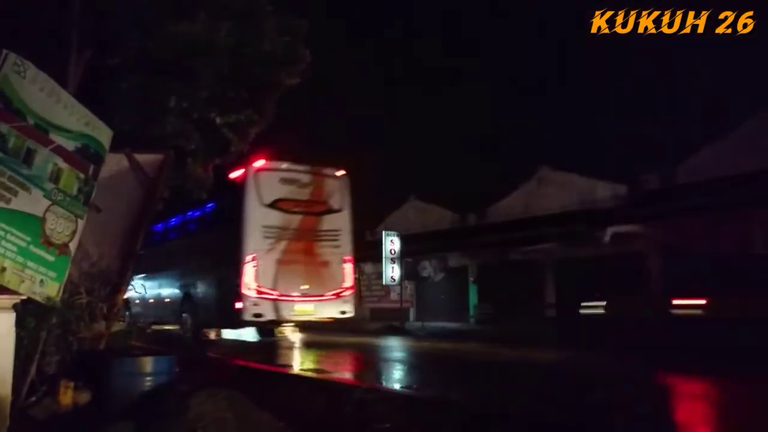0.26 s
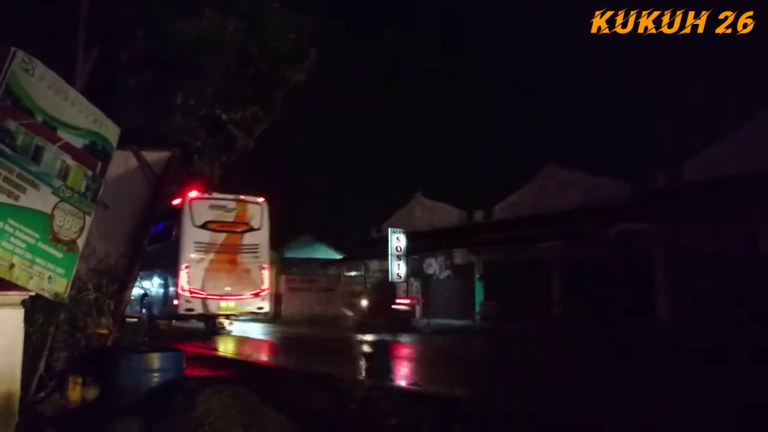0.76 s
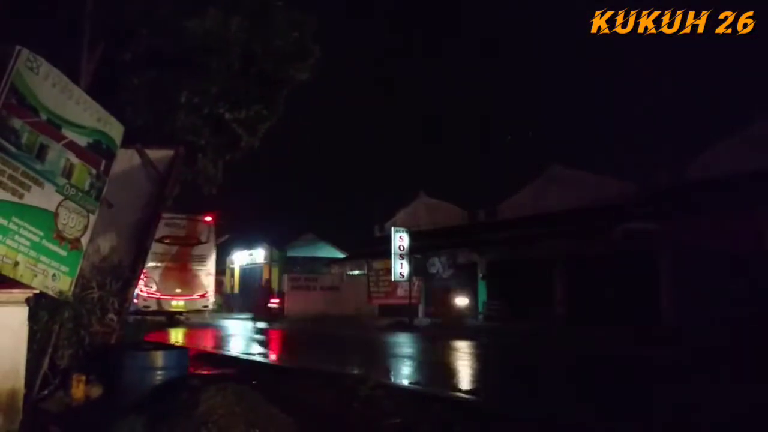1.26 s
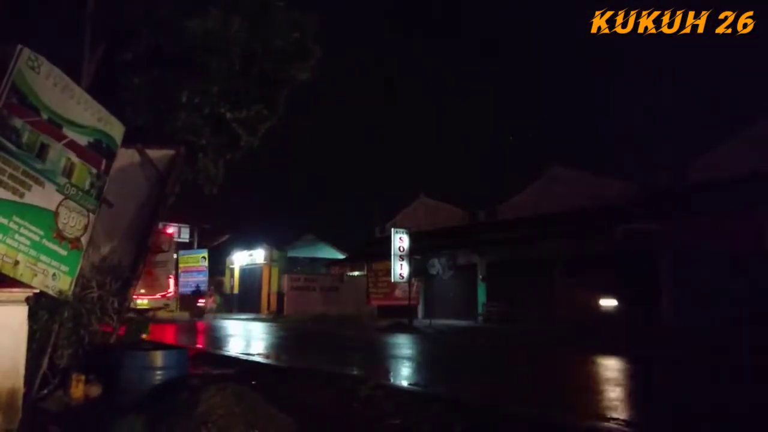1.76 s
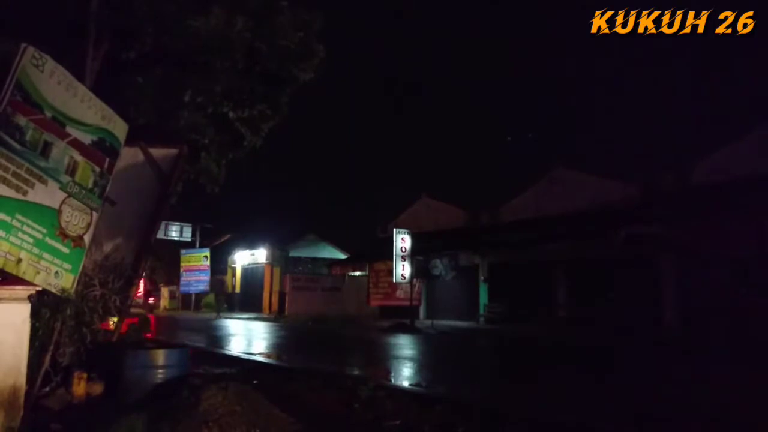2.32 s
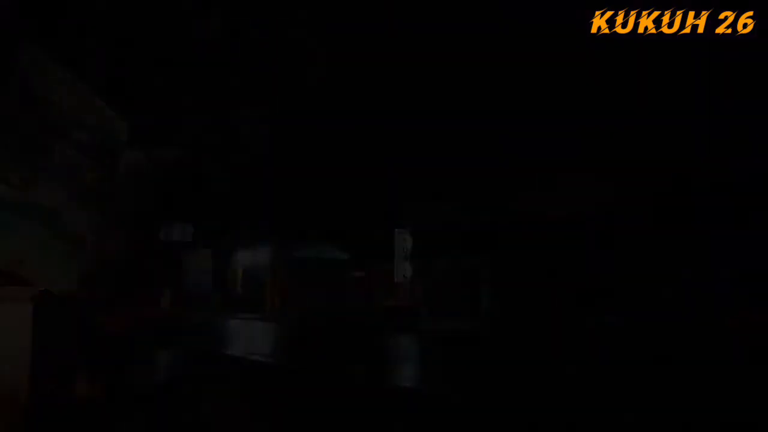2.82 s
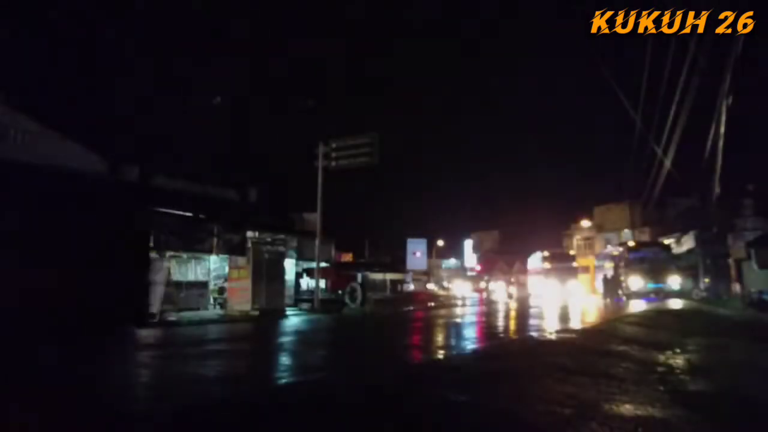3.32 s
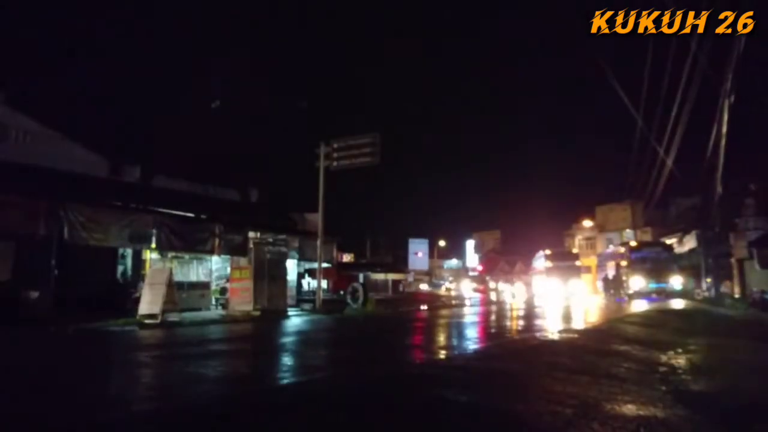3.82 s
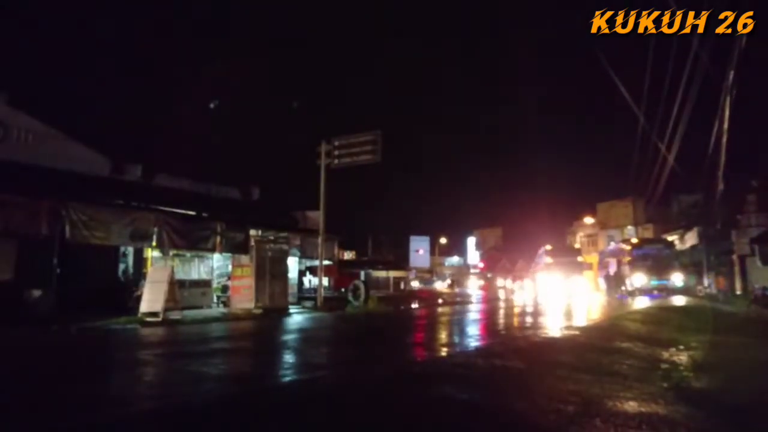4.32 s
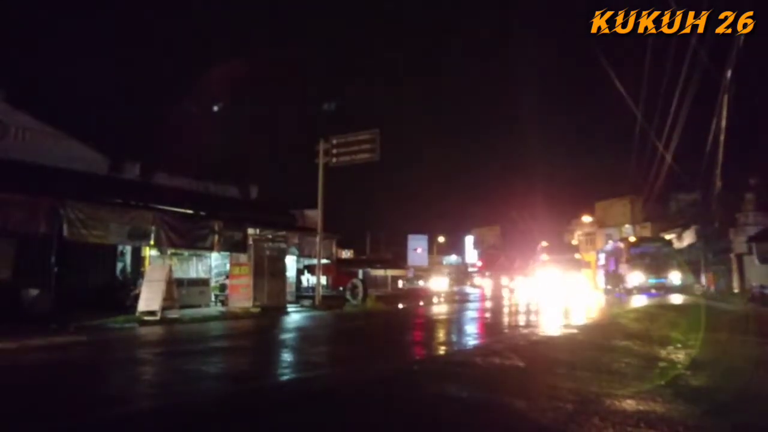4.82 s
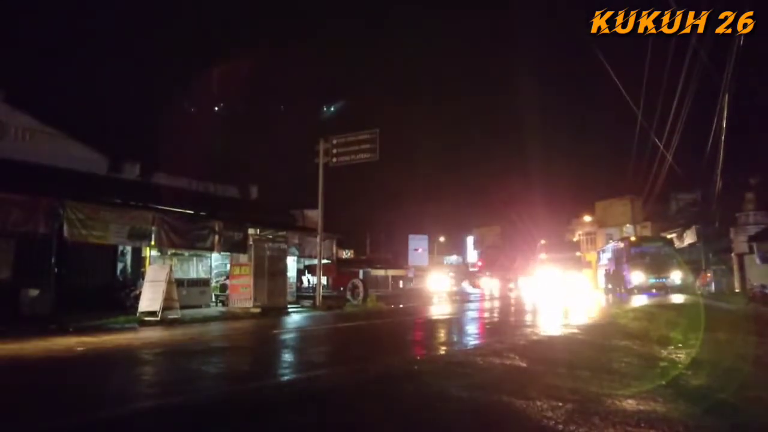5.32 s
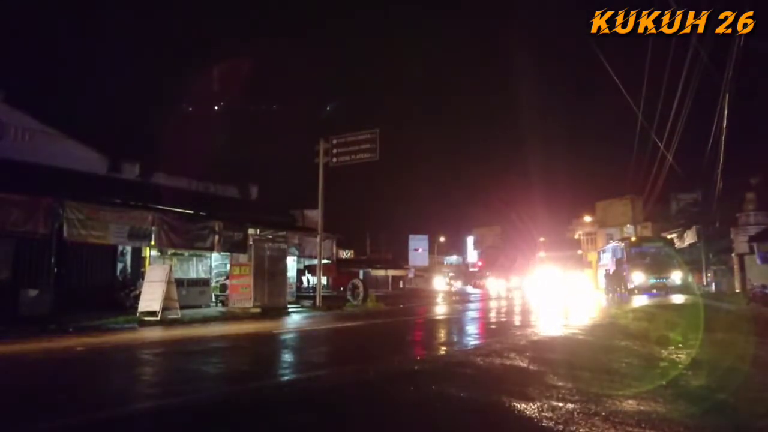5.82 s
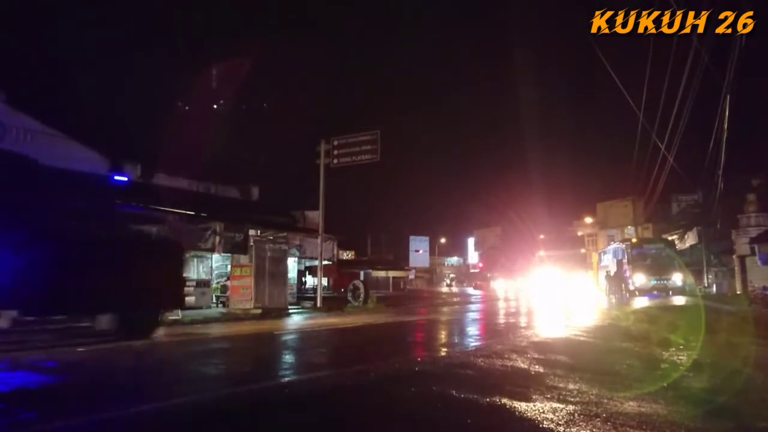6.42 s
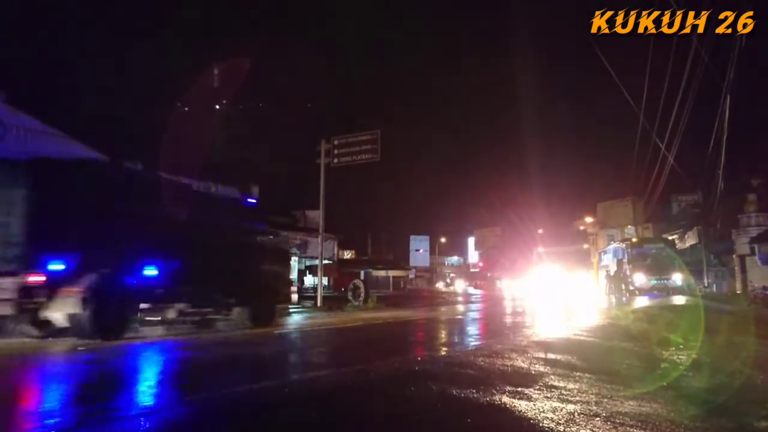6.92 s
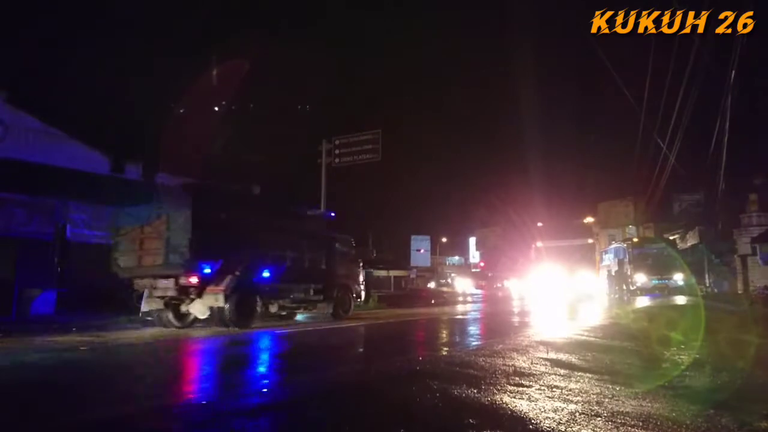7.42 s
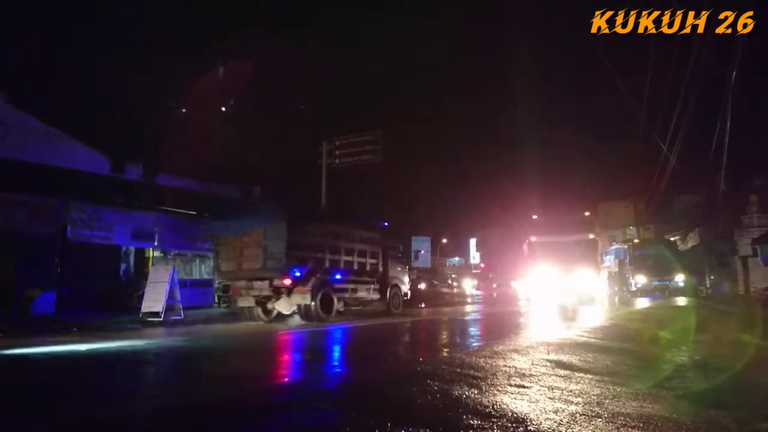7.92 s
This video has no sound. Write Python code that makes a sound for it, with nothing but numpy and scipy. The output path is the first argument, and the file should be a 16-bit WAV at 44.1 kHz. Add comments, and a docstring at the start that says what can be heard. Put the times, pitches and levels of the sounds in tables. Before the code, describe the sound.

A coach accelerates off as a motorbike revs past, fading to silence before a diesel lorry passes close, tyres rumbling and hissing through water.

```python
"""A diesel coach howls as it pulls away on a wet main road at night, while a motorbike revs up and passes.
Heard from the kerb, this fades to silence; then a diesel lorry cuts in, rolling close by as it slows.
Engines hum and knock with each firing of a cylinder; tyres rumble, drone and throw up hissing spray.
The left microphone port (its sound opening) is shaded at first and almost covered for the lorry."""
import sys
import numpy as np
from scipy import signal
from scipy.fft import rfft, irfft, next_fast_len
from scipy.io import wavfile

SR = 44100
rng = np.random.default_rng(int(sys.argv[2]) if len(sys.argv) > 2 else 0)


def bounce(signal):
    """Save signal as a 16-bit WAV file at the path given by the first command-line argument."""
    frames = np.transpose(np.atleast_2d(signal))
    limited = np.clip(frames, -1, 1)
    pcm = np.round(limited * 32767).astype(np.int16)
    wavfile.write(sys.argv[1], SR, pcm)


N = 360297
T = np.arange(N) / SR
SIZE = next_fast_len(N, real=True)
FREQ = np.arange(SIZE // 2 + 1) * SR / SIZE
HIDING_S, HIDDEN_S = 1.16, 1.55  # the coach goes out of sight and its howl, knock and hiss drop away
CUT_IN_S = 3.894  # the silence ends


def coach_firing():
    """How many times a second the coach's engine fires: faster and faster until the gear change."""
    start_hz, climb_hz_per_s, gear_change_s = 101.75, 14.3, 1.27
    return start_hz + climb_hz_per_s * np.minimum(T, gear_change_s)


def coach_exhaust():
    """Exhaust puffs merge into a rising hum; in the next gear the coach drones on in the distance."""
    db = -24.5 - 62 * since(HIDING_S - .08)
    near = exhaust(coach_firing(), [db - 1.5, db - 11, db - 21, db - 11.5], rough=.3)
    far_firing_hz = 103  # from afar only its even harmonics are heard
    far = exhaust(np.full(N, 2 * far_firing_hz), [-41.5, -39.5], rough=.7)
    return near + far * ramp(HIDDEN_S, 1.82) * undb(-12 * since(2.57))


# The note of the howl from the coach's engine bay: (time [s], pitch [Hz])
HOWL_PITCH = [(0, 902), (.27, 930), (.39, 907), (.49, 942), (.6, 908), (.85, 946), (1.26, 921), (1.38, 864),
              (1.7, 845)]
# Its whistle swells and dips: (time [s], half length [s], level change [dB])
WHISTLE_SWELLS = [(.11, 0.027, 8), (.28, .05, -4), (.46, 0.11, 7), (.65, 0.048, 5), (.81, 0.052, -6.5),
                  (1.11, .03, 2.5)]
def coach_howl():
    """A whistle in a wider rush, throbbing once per round of the six cylinders."""
    hz = curves(HOWL_PITCH)[0]
    swell_db, hidden = swells(WHISTLE_SWELLS), ramp(HIDING_S, HIDDEN_S)
    # out of sight, the whistle drops more than the rush
    whistle = whine(hz, width_hz=50, steady=4, warble=.02) * undb(swell_db - 10.5 * hidden)
    rush = whine(hz * 1.02, width_hz=91, steady=.3, warble=.02004)
    rush *= undb(-5.5 + .5 * swell_db - 2.9 * hidden)
    throb = 1 + .45 * np.sin(angle(coach_firing()) / 6)
    return (whistle + rush) * throb * undb(-23) * (1 - ramp(1.62, 1.78))


def receding(start_db, hidden_db, away_db_per_s):
    """Gain that sinks as the coach draws away, and drops further as it goes out of sight."""
    return undb(start_db - hidden_db * ramp(HIDING_S, HIDDEN_S) - away_db_per_s * T)


# The tone of the coach's engine block: (frequency [Hz], level [dB])
COACH_BLOCK_TONE = [(590, -27.5), (1000, 0.5), (1170, -5), (1410, 0.5), (1600, -3), (1810, -1),
                    (2240, -3.5), (2570, -2), (2980, -14), (3100, -28), (4030, -43), (6820, -120)]
def coach_knock():
    """Diesel firings rattle the coach's metal engine block."""
    knock = clatter(coach_firing(), COACH_BLOCK_TONE, depth=.9, scatter_db=1.5)
    return knock * receding(-17, hidden_db=10.5, away_db_per_s=.62)


# The hiss of the coach's spray: (frequency [Hz], level [dB])
COACH_HISS = [(1710, -20), (2900, -2.5), (3180, -3.5), (4000, 0), (4390, -2.5), (4940, -2.5), (5810, -9.5),
              (7220, -5), (9890, -25.5), (10900, -21.5), (12000, -25), (14100, -19), (15500, -20)]
def coach_spray():
    """Water flies off the coach's tyres; the hiss all but vanishes once it is out of sight."""
    water = spray(COACH_HISS, drops_per_s=1400, drops_db=-12, flutter_db=.6)
    return water * receding(-21.5, hidden_db=25, away_db_per_s=2.5)


# The engine hum swells briefly twice: (time [s], half length [s], level change [dB])
HUM_SWELLS = [(2, 0.035, 5.5), (2.38, .05, 3)]
# The motorbike's higher harmonics growl: (time [s], half length [s], level change [dB])
BIKE_GROWLS = [(1.58, 0.05, 9), (2.24, 0.072, 2.5)]
def bike_exhaust():
    """The motorbike revs until the throttle eases; its second harmonic carries from afar, then the rest."""
    start_hz, climb_hz_per_s, sag_hz_per_s, eases_s = 56.37, 9.8, 4.7, 2.42
    hz = start_hz + climb_hz_per_s * np.minimum(T, eases_s) - sag_hz_per_s * since(eases_s)
    first_db = -27 + hold(1.78, 2.13, rise_db_per_s=24.5, fall_db_per_s=5)
    second_db = -23 + hold(.78, eases_s, rise_db_per_s=26, fall_db_per_s=36) + swells(HUM_SWELLS)
    growl_db = -35 + hold(1.45, 2.05, rise_db_per_s=7.5, fall_db_per_s=6.5) + swells(BIKE_GROWLS)
    upper_db = [growl_db - drop for drop in (3, .5, 9, 16.5)]
    return exhaust(hz, [first_db, second_db, *upper_db], rough=.28)


# The hiss of the motorbike's spray: (frequency [Hz], level [dB])
BIKE_HISS = [(1710, -25.5), (2900, -1), (4000, 1.5), (4640, 2), (6230, -3.5), (7220, 2.5), (9100, -17),
             (13500, -20.5), (14500, -30.5), (15500, -38.5)]
def bike_spray():
    """Spray peaks as the motorbike goes by, over the steady hiss of tyres further off."""
    water = spray(BIKE_HISS, drops_per_s=1500, drops_db=-6, flutter_db=.8)
    passing, wet_road = undb(-28.5) * nearness(closest_s=2.62, pass_s=.27), undb(-34)
    return water * np.hypot(passing, wet_road)


# The rumble of the coach's and the motorbike's tyres: (frequency [Hz], level [dB])
COACH_RUMBLE = [(25, -27), (50, -15), (90, -5), (190, -3), (330, -5), (460, 0), (720, 2.5), (900, -3),
                (1150, -7.5), (1800, -55.5)]
BIKE_RUMBLE = [(25, -14), (55, 3.5), (100, 4), (200, 7), (300, 1.5), (400, 0.5), (720, 3), (950, -7),
               (1800, -53)]
def coach_and_bike_tyres():
    """As the coach goes out of sight, the motorbike's tyres take over the rumble."""
    tyres = blend(rumble(COACH_RUMBLE, flutter_db=0), rumble(BIKE_RUMBLE, flutter_db=2), 1.1, 2)
    return tyres * receding(-20, hidden_db=1.5, away_db_per_s=2.5)


# The speed of the lorry's engine: (time [s], firing rate [Hz])
LORRY_FIRING = [(3.9, 59.9), (4.5, 57.83), (5.1, 55.46), (5.6, 50.9), (6.3, 47.5), (6.8, 46), (7.3, 47.9),
                (8.17, 45.2)]
# Its lowest note throbs and its second harmonic booms: (time [s], half length [s], level change [dB])
LORRY_THROBS = [(4.52, .1, 5), (5.1, .1, 1.5)]
LORRY_BOOMS = [(6.65, .17, 11), (7.8, 0.25, 8.5)]
def lorry_exhaust():
    """The deep hum of a slowing diesel; its lowest note weakens when the throttle is eased."""
    first_db = -35.5 + hold(4.43, 5.26, rise_db_per_s=24, fall_db_per_s=4) + swells(LORRY_THROBS)
    first_db -= 8 * ramp(6.4, 6.55)  # the throttle eases
    upper_db = -40.5 + hold(4.6, 4.6, rise_db_per_s=32, fall_db_per_s=1.5)
    harmonics_db = [first_db, upper_db + swells(LORRY_BOOMS), upper_db - 4, upper_db - 10]
    return exhaust(curves(LORRY_FIRING)[0], harmonics_db, rough=.22)


# The tone of the lorry's engine block from the front and the rear: (frequency [Hz], level [dB])
FRONT_BLOCK_TONE = [(740, -44), (1250, -4), (1980, -2), (2470, -7), (2900, -8), (3100, -13.5), (4030, -15),
                    (6820, -120)]
REAR_BLOCK_TONE = [(740, -26), (1250, -10), (1560, -1.5), (1970, -3.5), (2280, -7.5), (3100, -13),
                   (4030, -39), (6820, -120)]
def lorry_knock():
    """Diesel knock changes tone and dies away as the lorry goes by."""
    firing_hz = curves(LORRY_FIRING)[0]
    front = clatter(firing_hz, FRONT_BLOCK_TONE, depth=.53, scatter_db=3.5)
    rear = clatter(firing_hz, REAR_BLOCK_TONE, depth=.55, scatter_db=4)
    return blend(front, rear, 5.15, 6.8) * undb(-24.5 - 2 * since(4.84))


# The rumble of the lorry's tyres from the front and the rear: (frequency [Hz], level [dB])
FRONT_RUMBLE = [(25, -23), (50, -1), (90, -4), (190, -2.5), (280, 7.5), (450, 4), (580, 5), (800, 2),
                (1050, 4.5), (1300, -4), (1700, -33)]
REAR_RUMBLE = [(25, -22), (50, -20), (100, -1), (190, 4.5), (280, 4), (430, 5.5), (580, -1.5), (800, 0),
               (1050, 1.5), (1300, -7), (1700, -40)]
def lorry_tyres():
    """The tyres' rumble holds while the lorry is near, then dies away."""
    front, rear = rumble(FRONT_RUMBLE, flutter_db=1.62), rumble(REAR_RUMBLE, flutter_db=.7)
    return blend(front, rear, 4.88, 6.4) * undb(-25.5 - 2 * since(5.96))


# The drone of the tyre tread swells and dips: (time [s], half length [s], level change [dB])
TREAD_SWELLS = [(5.08, 0.12, 2.5), (5.25, .05, -4.5), (5.8, 0.058, 6), (5.96, 0.065, -10),
                (6.14, 0.07, 7.5), (6.6, .08, 1), (8, .1, 7)]
def lorry_tread():
    """Tread blocks drum on the road; the note glides down as the slowing lorry goes by."""
    midway_hz, drop_hz, midway_s, glide_s = 350.5, 51.83, 5.91, .9
    hz = midway_hz - drop_hz * np.tanh((T - midway_s) / glide_s)
    note = whine(hz, width_hz=17, steady=2.6, warble=.008)
    broad = whine(hz * 1.13, width_hz=68, steady=.71, warble=.02)  # from blocks of mixed length
    throb = undb(1.3 * walk(11.5))
    db = -30 + swells(TREAD_SWELLS) + hold(5, 6, rise_db_per_s=5, fall_db_per_s=.5)
    return (note + broad) * throb * undb(db) * nearness(closest_s=5.66, pass_s=.66)


# The hiss of the lorry's front spray, rear spray and finest mist: (frequency [Hz], level [dB])
FRONT_HISS = [(1710, -12.5), (2900, -7.5), (3130, -7), (3580, -6.5), (4210, -2.5), (6060, -2.5), (7270, -1),
              (7580, -2.5), (9100, -19), (10300, -18), (12100, -26), (14100, -29), (15500, -38)]
REAR_HISS = [(1710, -19), (2900, 0.5), (3240, -2), (4060, -0.5), (4700, 3), (6180, -5), (7370, 0.5),
             (7800, -3.5), (8780, -18), (10400, -17), (12000, -28), (14800, -27), (15500, -32)]
MIST_HISS = [(5000, -56), (7000, 3.5), (8200, -3), (9200, -11.5), (11000, -22), (15000, -33)]
# Spray thins and surges with the water on the road: (time [s], half length [s], level change [dB])
SPRAY_SWELLS = [(4.44, 0.2, -1.5), (4.7, 0.29, 1), (6, 0.17, -1), (6.33, 0.11, 0.8)]
def lorry_spray():
    """Spray hisses and echoes off a nearby wall; fine mist is heard only as the wheels go by."""
    front = spray(FRONT_HISS, drops_per_s=1800, drops_db=-5.5, flutter_db=.75)
    rear = spray(REAR_HISS, drops_per_s=1600, drops_db=-5, flutter_db=.16)
    water = blend(front, rear, 6.25, 7.55)
    echo_lag_s = np.interp(T, [5.45, 7.4], [.00092, .00181])  # grows as the lorry draws away
    echo = .097 * np.interp(T - echo_lag_s, T, water)
    mist = spray(MIST_HISS, drops_per_s=2300, drops_db=6, flutter_db=2.3)
    mist *= undb(-7) * np.exp(-((T - 6) / .8) ** 2)
    return (water + echo + mist) * undb(-28 + swells(SPRAY_SWELLS) - 2 * since(6.62))


# The notes of the lorry's wheel arches: (pitch [Hz], width [Hz], level [dB])
ARCH_NOTES = [(2019, 120, -34), (2876, 83, -37.5)]
def wheel_arches():
    """Spray makes the wheel arches ring while the lorry approaches."""
    rings = sum(undb(db) * whine(np.full(N, hz), width, steady=0, warble=.01)
                for hz, width, db in ARCH_NOTES)
    return rings * undb(-18 * since(5.2))


def tread_ahead():
    """The tyre tread of a vehicle ahead drones lower and lower and dies away."""
    hz = 371 - 44 * since(CUT_IN_S)
    return whine(hz, width_hz=33, steady=2, warble=.0096) * undb(-31 - 32 * since(4.26))


# An engine further along the road: (time [s], firing rate [Hz], level [dB])
FAR_ENGINE = [(3.9, 77, -30), (4.2, 76.5, -34.5), (4.5, 76, -46), (6.3, 68.9, -42), (7.8, 58.2, -36.5),
              (8.17, 57.8, -38)]
def far_traffic():
    """A distant exhaust hums unevenly as its engine slows."""
    hz, db = curves(FAR_ENGINE)
    return exhaust(hz, [db - 3, db - 13], rough=.56)


def exhaust(hz, harmonics_db, rough):
    """Tones at 1, 2, 3... times the firing rate (harmonics); uneven burning shakes each one's strength."""
    phase = angle(hz)
    return sum(np.sqrt(2) * undb(db) * (1 + rough * walk(13))
               * np.sin(k * phase + rng.uniform(0, 2 * np.pi)) for k, db in enumerate(harmonics_db, 1))


def whine(hz, width_hz, steady, warble):
    """A narrow resonance kept ringing by swirling air, around a core whose pitch warbles."""
    phase = angle(hz * (1 + warble * walk(23.05)))
    return unit((steady + walk(width_hz)) * np.cos(phase) + walk(width_hz) * np.sin(phase))


def clatter(hz, block_tone, depth, scatter_db):
    """Each firing sends a burst of knock, of its own strength, through the engine block."""
    cycle = angle(hz) / (2 * np.pi)
    strength = undb(scatter_db * rng.standard_normal(4096))[cycle.astype(int)]
    burst = strength * np.exp(-(cycle % 1) / 1.2)
    return unit(colour(noise() * (1 + depth * burst), block_tone))


def rumble(tone, flutter_db):
    """Tyres roll over uneven asphalt."""
    return unit(colour(noise(), tone)) * undb(flutter_db * walk(13))


def spray(tone, drops_per_s, drops_db, flutter_db):
    """Water torn off the tread: mist, and single drops that strike the road and the wheel arches."""
    drops = (rng.random(N) < drops_per_s / SR) * noise()
    water = noise() + undb(drops_db) * unit(drops)
    return unit(colour(water, tone)) * undb(flutter_db * walk(25))


def undb(db):
    """Turn decibels into a gain to multiply by."""
    return 10 ** (np.asarray(db) / 20)


def unit(x):
    """Scale to an average strength (rms) of 1."""
    return x / np.sqrt(np.mean(x ** 2))


def curves(table):
    """Join a timed table's points with lines, one curve per column."""
    times, *columns = np.transpose(table)
    return [np.interp(T, times, column) for column in columns]


def shape(x, gain):
    """Filter by a gain for each frequency."""
    return irfft(rfft(x, SIZE) * gain, SIZE)[:N]


def colour(x, tone):
    """Filter by points of (frequency [Hz], level [dB])."""
    hz, db = np.transpose(tone)
    return shape(x, undb(np.interp(np.log(FREQ + 1), np.log(hz), db)))


def noise():
    """White noise: an even hiss."""
    return rng.standard_normal(N)


def walk(rate):
    """A smooth random wobble that changes up to rate times a second."""
    return unit(shape(noise(), 1 / (1 + (FREQ / rate) ** 4)))


def angle(hz):
    """Running phase of a moving frequency."""
    return 2 * np.pi * np.cumsum(hz) / SR


def ramp(start, end):
    """Go from 0 to 1 between two times."""
    return np.clip((T - start) / (end - start), 0, 1)


def since(start):
    """Seconds gone by since a time, 0 before it."""
    return np.maximum(T - start, 0)


def hold(start, end, rise_db_per_s, fall_db_per_s):
    """Level in dB that rises to 0, holds from start to end, and falls."""
    return -rise_db_per_s * np.maximum(start - T, 0) - fall_db_per_s * since(end)


def nearness(closest_s, pass_s):
    """Gain of something going by, 3 dB down pass_s before and after it is closest."""
    return 1 / np.hypot(1, (T - closest_s) / pass_s)


def swells(table):
    """Level in dB of smooth, brief swells and dips."""
    return sum(db * np.exp(-((T - time) / length) ** 2) for time, length, db in table)


def blend(first, second, start, end):
    """Pass from one sound to another at constant power."""
    share = ramp(start, end)
    return np.sqrt(1 - share) * first + np.sqrt(share) * second


def other_port(heard, unrelated):
    """Sound from all sides reaches the second port alike in the bass and unrelated in the treble."""
    gap_m, sound_m_per_s = .14, 343
    likeness = np.sinc(2 * FREQ * gap_m / sound_m_per_s)
    return shape(heard, likeness) + shape(unrelated, np.sqrt(1 - likeness ** 2))


def coach_and_bike_roar():
    """Their tyres, knock, spray and howl together, with fresh noise on each call."""
    return coach_and_bike_tyres() + coach_knock() + coach_spray() + bike_spray() + coach_howl()


# What the shaded left port lets through: (frequency [Hz], level [dB])
SHADED_PORT = [(150, -3.5), (900, -0.5), (2500, -3), (6200, 0), (6900, -12.5), (7300, -28.5), (9500, -13.5),
               (15000, -20)]
def coach_and_bike_pass():
    """Two exhaust notes climb under the roar, in stereo; the left port grows more shaded."""
    engines = coach_exhaust() + bike_exhaust()
    roar = coach_and_bike_roar()
    shade = undb(-1 - 4.5 * ramp(.81, 1.57))
    left = shade * colour(engines + other_port(roar, coach_and_bike_roar()), SHADED_PORT)
    return np.array([left, engines + roar]) * 2 / np.sqrt(1 + shade ** 2)


# The lorry's rumble, knock and ringing swell and dip: (time [s], half length [s], level change [dB])
ROAR_SWELLS = [(3.95, 0.15, 1.5), (4.42, 0.12, -1.5), (4.68, 0.1, 1), (6.55, 0.072, 2)]
def lorry_roar():
    """The lorry's tyres, knock and spray plus the drone ahead, with fresh noise on each call."""
    body = (lorry_tyres() + lorry_knock() + wheel_arches()) * undb(swells(ROAR_SWELLS))
    return body + lorry_spray() + lorry_tread() + tread_ahead()


# What the almost covered left port lets through: (frequency [Hz], level [dB])
COVERED_PORT = [(45, -11.5), (120, -15), (250, -32), (600, -35), (1000, -42), (2000, -54), (4000, -57),
                (7000, -73)]
def lorry_pass():
    """Two engines slow under the roar, in stereo; only bass gets through on the left, a little late."""
    engines = lorry_exhaust() + far_traffic()
    roar = lorry_roar()
    left = colour(engines + other_port(roar, lorry_roar()), COVERED_PORT)
    lag_s = .0005
    return 2 * np.array([np.interp(T - lag_s, T, left), engines + roar])


def scene():
    """The coach and motorbike fade out; after a silence the lorry cuts in."""
    fade = (1 - ramp(2.52, 3.05)) ** .94
    return coach_and_bike_pass() * fade + lorry_pass() * (T >= CUT_IN_S)


def record(dry):
    """Round off the highest peaks and cut the very top of the treble."""
    ceiling, top_hz = .9, 15400
    rounded = dry / (1 + np.abs(dry / ceiling) ** 8) ** (1 / 8)
    return signal.sosfilt(signal.ellip(10, .1, 80, top_hz, fs=SR, output="sos"), rounded)


dry = scene()
out = record(dry)
bounce(out)
```